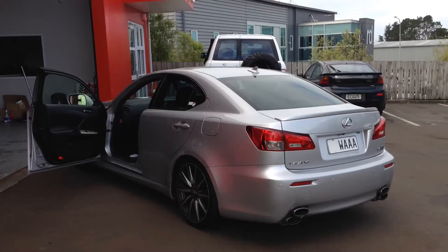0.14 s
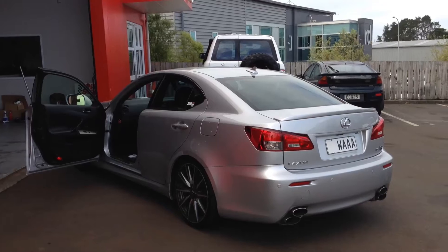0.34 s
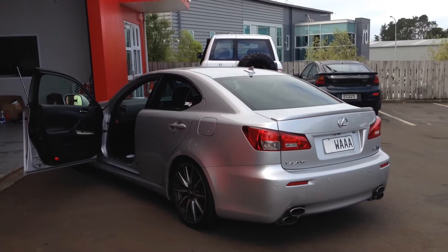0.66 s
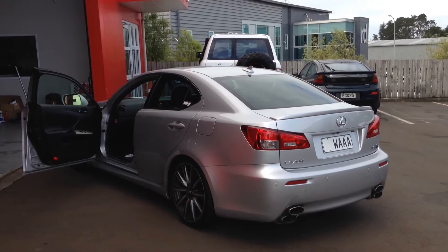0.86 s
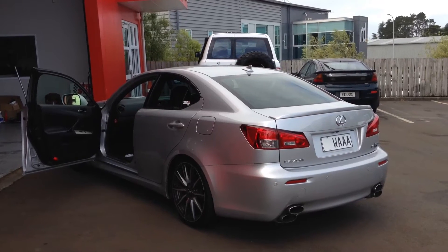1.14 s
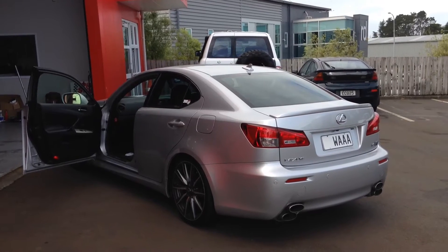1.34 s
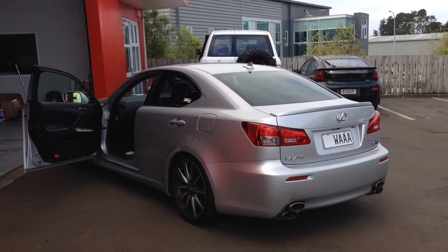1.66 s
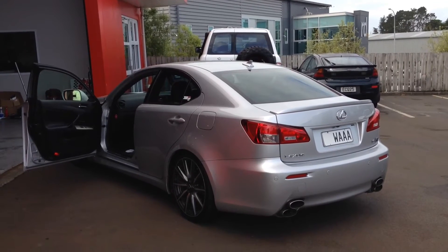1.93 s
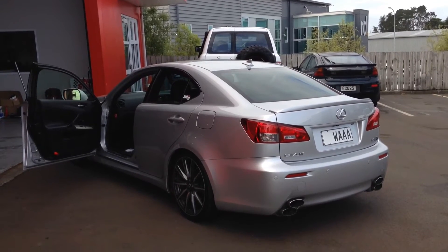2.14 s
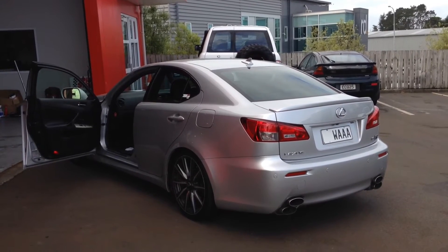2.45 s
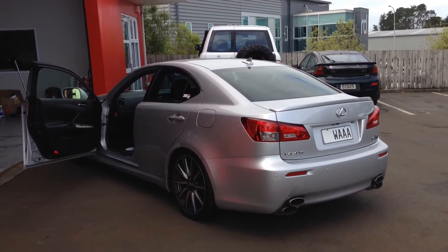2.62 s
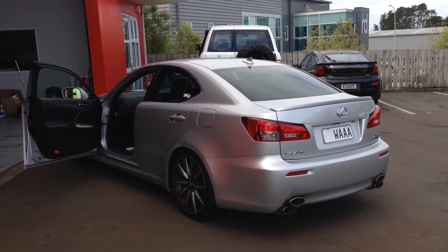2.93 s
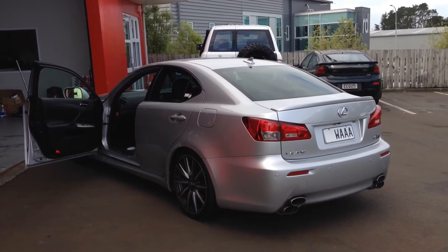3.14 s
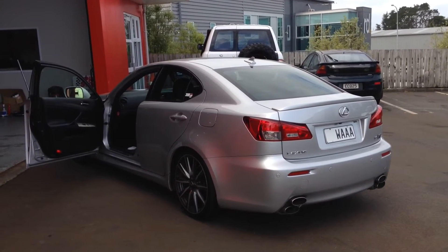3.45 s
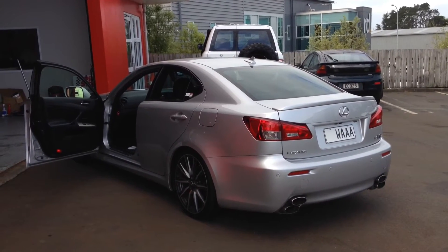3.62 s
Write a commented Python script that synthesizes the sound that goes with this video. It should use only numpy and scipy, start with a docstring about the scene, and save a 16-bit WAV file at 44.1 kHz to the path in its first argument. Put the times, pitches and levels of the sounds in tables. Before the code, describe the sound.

A parked car's open-exhaust eight-cylinder engine starts abruptly near idle at 0.1 s, growls up from 0.3 to a blip peak at 0.85, then falls in a cleaner hum. At 1.6 it snaps into a raspy climb, hitting the limiter from 2.05 to 2.5 in about eight rapid thumping bursts. It coasts down, thin metal buzzing near 2.9, and revs sharply again from 3.55, over low rumble and short yard echoes.

```python
"""A parked eight-cylinder car with an open exhaust is blipped, revved into its rev limiter, left to
coast down and blipped again. Under load the firings ring the pipes and gas rasps; coasting, the pumping
orders sing cleanly through the pipe resonances. The limiter cuts fuel and lets it back in short bursts.
Thin metal buzzes and valve gear, belts and fan hiss, over a low rumble and the bright tail of a yard."""
import sys
import numpy as np
from scipy import signal
from scipy.fft import rfft, irfft, next_fast_len
from scipy.io import wavfile
from scipy.ndimage import uniform_filter1d, minimum_filter1d

SR = 44100
rng = np.random.default_rng(int(sys.argv[2]) if len(sys.argv) > 2 else 0)


def gain_from_decibels(decibels):
    """Convert decibel values to linear amplitude factors."""
    exponent = np.asarray(decibels, float) / 20
    return 10 ** exponent


def store_pcm(level_fs):
    """Save levels as 16-bit WAV."""
    pcm = np.round(np.clip(level_fs, -1, 1) * 32767).astype(np.int16)
    wavfile.write(sys.argv[1], SR, np.atleast_2d(pcm).T)


N = 166698

# engine speed: (time [s], four-stroke cycle rate [Hz])
SPEED = [(.12, 17.2), (.25, 15.9), (.31, 16.1), (.37, 17.7), (.48, 22.6), (.65, 31.3), (.71, 35),
         (.78, 37.9), (.86, 39), (.95, 37.1), (1.11, 35.5), (1.2, 34.2), (1.35, 31), (1.47, 29.2),
         (1.56, 28), (1.62, 28.3), (1.67, 30.1), (1.8, 39), (1.9, 47), (2.0, 54), (2.06, 55.5),
         (2.45, 55.5), (2.6, 54), (2.72, 52.5), (2.88, 48), (3.12, 42.3), (3.36, 37.3), (3.52, 34.9),
         (3.6, 36.8), (3.7, 44), (3.78, 49.5)]
# exhaust under load: (time [s], firing level [dB], gas rasp level before the treble shelf [dB],
# rasp treble shelf [dB], turbulent growl level [dB])
LOAD = [(.12, -16, -43, 2, -28.5), (.18, -12.5, -44, -6, -32), (.27, -25, -55, -5, -30),
        (.31, -13.5, -63, -9, -25), (.38, -4.5, -48.5, -3.5, -24), (.42, -7, -40.5, -14, -17.5),
        (.5, -9, -40.5, 1, -12), (.63, -7.5, -29, -4, -15), (.72, -10.5, -27, -21, -13),
        (.8, -13, -30.5, -24, -18), (.87, -25.5, -57, 0, -39), (.95, -45, -53, 10, -41),
        (1.55, -40, -60, 4, -49), (1.6, -10.5, -37.5, -5, -13.5), (1.67, -6, -33, -17, -20),
        (1.71, -12, -25, -10, -13), (1.75, -10.5, -20, -6, -13), (1.9, -16, -17, 3.5, -23.5),
        (2.04, -16.5, -12, 2.5, -12.5), (2.45, -19, -14.5, 4, -18.5), (2.5, -7.5, -19, 2, -15),
        (2.55, -32, -40, -4, -17.5), (2.62, -24, -54, 0, -32), (3.52, -37, -53, 8, -45),
        (3.56, -13, -35, -18, -11), (3.6, -11.5, -19, -0.5, -11.5), (3.72, -14, -18.5, 6, -20.5),
        (3.78, -17.5, -19, -2.5, -23)]
LIMITER_START_S, LIMITER_END_S = 2.044, 2.53
PUFF_FLOOR = 0.45  # steady gas flow beneath the puffs of the firings


def unit(x):
    """Scaled to rms 1."""
    return x / np.sqrt(np.mean(x ** 2))


def curve(table, axis):
    """One column of a table, interpolated over time."""
    rows = np.array(table)
    return np.interp(np.arange(N) / SR, rows[:, 0], rows[:, axis])


def resonate(x, modes, ratio=-1):
    """Parallel resonances, each weighted by ratio against the one before; -1 alternates the sign."""
    out = 0
    for k, (hz, width_hz, db) in enumerate(modes):
        b, a = signal.iirpeak(hz, hz / width_hz, SR)
        out = out + ratio ** k * gain_from_decibels(db) * signal.lfilter(b, a, x)
    return out


def noise(points):
    """Noise of rms 1, its spectrum drawn through (Hz, dB) points on a log frequency axis."""
    rows, size = np.array(points), next_fast_len(N)
    hz = np.arange(size // 2 + 1) * SR / size + 1
    db = np.interp(np.log(hz), np.log(rows[:, 0]), rows[:, 1])
    spectrum = rfft(rng.standard_normal(size)) * gain_from_decibels(db)
    return unit(irfft(spectrum, size)[:N])


def walk(rate_hz):
    """Smooth random drift of rms near 1: random levels held 1 / rate_hz s and slewed twice."""
    k = int(SR / rate_hz)
    held = np.repeat(rng.standard_normal(N // k + 1), k)
    return 1.3 * uniform_filter1d(uniform_filter1d(held, k), k)[:N]


def rumble():
    """Low shaped noise whose level drifts slowly."""
    # rumble spectrum: (frequency [Hz], relative density [dB])
    spectrum = [(12, -57), (20, -39.5), (92, -20), (211, -4.5), (271, -7), (365, 0.5), (450, -42),
                (580, -56), (990, -120)]
    return gain_from_decibels(-23.5 + 2.35 * walk(6.003)) * noise(spectrum)


def yard_tail(car):
    """Walls return the car as a diffuse decaying tail, its bass rolled off."""
    t60_s, level_db, first_echo_s = 0.21, -12, 0.008
    t = np.arange(SR // 2) / SR
    tail = rng.standard_normal(len(t)) * gain_from_decibels(-60 * t / t60_s) * (t > first_echo_s)
    yard = signal.fftconvolve(car, tail / np.sqrt(np.sum(tail ** 2)))[:N]
    bright = signal.sosfilt(signal.butter(2, 500, "high", fs=SR, output="sos"), yard)
    return gain_from_decibels(level_db) * bright


def thuds():
    """The pipe rings briefly, with a soft start, as throttle or fuel snaps on."""
    # pipe rings: (start [s], frequency [Hz], level [dB], t60 [s])
    rings = [(0.298, 100, -5, 0.1), (.375, 300, -11, 0.37), (1.575, 112, -7.5, 0.16), (2.188, 146, -17, .1),
             (2.364, 142, -17, 0.076), (2.483, 115, -7.5, 0.084), (3.54, 511, -15, 0.21),
             (3.575, 1100, -11.5, .1), (3.584, 383, -1, .15)]
    rise_s = 0.0039
    out = np.zeros(N)
    for start_s, hz, db, t60_s in rings:
        t = np.maximum(np.arange(N) / SR - start_s, 0)
        envelope = gain_from_decibels(db - 60 * t / t60_s) * np.minimum(t / rise_s, 1)
        out += envelope * np.sin(2 * np.pi * hz * t)
    return out


def metal_buzz(cycles):
    """Four sharp, uneven taps a cycle ring thin metal."""
    # thin-metal resonances: (frequency [Hz], width [Hz], relative level [dB])
    modes = [(615, 150, -1), (770, 150, 4), (1100, 110, 6.5), (1330, 240, -4), (1550, 61, -5),
             (1790, 91, 4.5), (1940, 83, -5.5)]
    # buzz on the way down: (time [s], level [dB])
    levels = [(.8, -60), (.9, -44), (1.5, -46), (1.6, -60), (2.55, -60), (2.65, -35), (2.78, -35),
              (2.84, -26), (2.97, -24), (3.04, -34), (3.2, -36), (3.45, -42), (3.55, -60)]
    count = np.floor(4 * cycles + 0.015 * walk(150)).clip(0)
    taps = np.abs(np.diff(count, prepend=0)) * gain_from_decibels(3.1 * walk(80))
    return unit(resonate(taps, modes)) * gain_from_decibels(curve(levels, axis=1))


def fuel():
    """Gain of combustion: full, except at the limiter, where fuel is cut and returns in bursts."""
    # returning fuel: (start [s], length [s], level [dB])
    bursts = [(2.077, 0.023, -0.59), (2.132, 0.028, -2.2), (2.187, 0.028, 0.16), (2.251, 0.027, 0.32),
              (2.311, 0.023, 1), (2.362, 0.027, 1), (2.424, 0.021, 0.78), (2.49, 0.023, -1.6)]
    cut_db, rise_s, fall_s = -26, 0.0079, 0.004  # fall_s is a time constant
    t = np.arange(N) / SR
    gain = ((t < LIMITER_START_S) | (t > LIMITER_END_S)).astype(float)
    for start_s, length_s, db in bursts:
        rise = np.clip((t - start_s) / rise_s, 0, 1)
        fall = np.exp(-np.maximum(t - start_s - length_s, 0) / fall_s)
        gain += gain_from_decibels(db) * rise * fall
    return np.maximum(gain, gain_from_decibels(cut_db))


def pumping(cycles):
    """Clean orders of the cycle sing through the pipe; valve gear, belts and fan hiss."""
    # pumping and hiss: (time [s], pumping tone level [dB], mechanical hiss level [dB])
    coast = [(.12, -10, -47), (.6, -28.5, -33), (.75, -11.5, -27), (.87, -9, -33.5), (1.0, -14.5, -33),
             (1.2, -14, -35), (1.35, -13.5, -34.5), (1.5, -8.5, -37), (1.6, -16.5, -35), (1.9, -15, -17),
             (2.05, -15.5, -24), (2.5, -24.5, -28), (2.62, -16.5, -26), (2.75, -10, -28),
             (2.92, -10.5, -27), (3.1, -8.5, -30.5), (3.3, -10.5, -31.5), (3.5, -10, -32),
             (3.6, -14, -19.5), (3.78, -21.5, -31)]
    # what the pipe passes of each order: (frequency [Hz], gain [dB])
    passed = [(30, -18), (90, -24.5), (120, -21.5), (140, -11), (160, -21), (180, -18), (195, -11),
              (208, 2), (220, -8.5), (233, -13.8), (250, -18), (270, -8), (290, -17), (310, -7.5),
              (335, -8.2), (360, -7.5), (380, -3), (395, -14), (415, -24), (450, -17.5), (500, -18),
              (560, -21.5), (650, -24), (900, -18)]
    # pumping orders: (multiple of the cycle rate, relative level at mid speed [dB],
    # gain per 10 cycles a second [dB])
    order_table = [(1, -5.5, 2.5), (2, 6, 4.5), (3, 7, 0), (4, 14, -2.9), (5, 3.5, 0.6), (6, 15.5, -2.4),
                   (7, 10.5, -0.64), (8, 7, 8.5), (9, 0.7, 4.5), (10, 5.5, -1), (11, -1.4, 1),
                   (12, -4, -2.2), (13, -12.5, 5.5), (14, -1, 4), (15, -9, 2.8), (16, -4, 3.5),
                   (17, -18.5, 4), (18, -15.5, 2), (19, -18, 3.5), (20, -17, -0.5)]
    # hiss spectrum: (frequency [Hz], relative density [dB])
    hiss_spectrum = [(320, -22), (550, -1.5), (607, -5.5), (670, -7.5), (938, -5), (1080, -3.5), (2540, -8),
                     (2810, -16.5), (3320, -13), (14500, -35.5), (15800, -41)]
    mid_speed_hz, wobble_db = 38, 1.5
    cut_share = 0.17  # share of the fuel cut's dB that reaches the tones
    hz = curve(SPEED, axis=1)
    pipe_hz, pipe_db = np.transpose(passed)
    orders = np.zeros(N)
    for k, db, slope_db in order_table:
        level_db = db + slope_db * (hz - mid_speed_hz) / 10 + np.interp(k * hz, pipe_hz, pipe_db)
        level_db = level_db + wobble_db * walk(9)
        orders += gain_from_decibels(level_db) * np.sin(2 * np.pi * (k * cycles + rng.random()))
    tones = unit(orders) * gain_from_decibels(curve(coast, axis=1)) * fuel() ** cut_share
    # the hiss drifts at random and swells four times a cycle
    flutter_db = 1.2 * walk(25.12) + 0.83 * np.sin(2 * np.pi * 4 * cycles)
    hiss = noise(hiss_spectrum) * gain_from_decibels(flutter_db)
    return tones + hiss * gain_from_decibels(curve(coast, axis=2))


def burst_thump(gain):
    """Each returning burst of fuel thumps: deep band noise follows the fuel at the limiter."""
    t = np.arange(N) / SR
    band = signal.butter(2, (73, 192), "band", fs=SR, output="sos")
    deep = unit(signal.sosfilt(band, rng.standard_normal(N)))
    limiting = (t > LIMITER_START_S) * (t < LIMITER_END_S)
    return deep * gain_from_decibels(-17.5) * uniform_filter1d(gain * limiting, size=441)


def gas_rasp(phase, size, gain):
    """A decaying puff of hissing gas follows each firing and rings tail pipe and silencer shell."""
    # rasp spectrum: (frequency [Hz], relative density [dB])
    spectrum = [(290, -45), (500, 2), (553, -19.5), (771, -3.5), (904, -11.5), (1010, -1.5), (1170, -6.5),
                (1840, -2), (2310, -10.5), (2520, -8.5), (2710, -17), (3270, -9), (8990, -26), (14500, -33),
                (15800, -41)]
    # tail-pipe and silencer-shell rings: (frequency [Hz], width [Hz], relative level before ratio [dB])
    shell = [(544, 70, -5.5), (792, 35, 3), (973, 50, -1), (1122, 65, 1), (1602, 55, -6), (1880, 110, -2),
             (2540, 110, 1.5), (3196, 250, 3), (3925, 71, -7.5), (4840, 690, 8.5)]
    puff_share = 0.45  # decay constant as a share of the firing interval
    puffs = PUFF_FLOOR + np.exp(-(phase % 1) / puff_share)
    rasp = size ** 1.2 * puffs * noise(spectrum)
    rasp = unit(rasp + resonate(rasp, shell, ratio=0.86))
    treble = signal.sosfiltfilt(signal.butter(1, 4500, "high", fs=SR, output="sos"), rasp)
    rasp = rasp + treble * (gain_from_decibels(curve(LOAD, axis=3)) - 1)
    return rasp * gain * gain_from_decibels(curve(LOAD, axis=2))


def pipe_ring(x, gain, axis):
    """The exhaust pipe resonates to a drive that follows the fuel and one level column of LOAD."""
    # pipe resonances under load: (frequency [Hz], width [Hz], relative level [dB])
    modes = [(139, 37.4, -1.5), (236.5, 34.3, -1.5), (308.2, 36, -2), (389.6, 53, -5), (449, 30, -10.5),
             (494.5, 44, -14), (603, 62, -18), (842, 27, -24)]
    driven = x * gain * gain_from_decibels(curve(LOAD, axis))
    return resonate(driven, modes) / np.std(resonate(x, modes))


def firings(cycles):
    """Eight uneven, rounded pressure pulses a cycle and turbulent gas ring the pipe, with rasp and thump."""
    # mean strength of each cylinder in firing order: (level [dB])
    cylinder_db = [-4, -0.23, -4, -3.1, 0.28, -0.59, -0.82, -0.93]
    scatter_db, jitter = 1.6, 0.03  # jitter in firing intervals
    sharpness = 1.4
    phase = 8 * cycles + jitter * walk(70) + 1
    index = phase.astype(int)
    count = index.max() + 1
    size_db = np.resize(cylinder_db, count) + scatter_db * rng.standard_normal(count)
    size = gain_from_decibels(size_db)[index]
    push = size * (np.exp(-sharpness * np.cos(2 * np.pi * phase)) - np.exp(-sharpness))
    gas = rng.standard_normal(N) * (PUFF_FLOOR + unit(push))
    gain = fuel()
    ringing = pipe_ring(push, gain, axis=1) + pipe_ring(gas, gain, axis=4)
    return ringing + gas_rasp(phase, size, gain) + burst_thump(gain)


def engine_cycles():
    """Running count of engine cycles; the speed wanders and bounces with the fuel."""
    on = uniform_filter1d(fuel(), size=882)
    bounce = 0.05 * (on - uniform_filter1d(on, size=2600))
    return np.cumsum(curve(SPEED, axis=1) * (1 + 0.003 * walk(12) + bounce)) / SR


def scene():
    """Engine, the bright tail of the walled yard and a low rumble."""
    cycles = engine_cycles()
    car = thuds() + metal_buzz(cycles) + pumping(cycles) + firings(cycles)
    return (rumble() + yard_tail(car) + car)[None]


def band_limit(x):
    """A steep low-pass at the top of the band."""
    return signal.sosfilt(signal.butter(12, 15950, fs=SR, output="sos"), x)


def record(dry):
    """Sound starts after a blank; a look-ahead limiter holds the peaks, then a steep low-pass follows."""
    start_s, ceiling_db, top_hz = 0.1195, -0.4, 15300
    x = dry * (np.arange(N) >= start_s * SR)
    need = np.minimum(1, gain_from_decibels(ceiling_db) / (np.abs(x) + 1e-9))
    gain = uniform_filter1d(minimum_filter1d(need, size=883), size=661)
    low_pass = signal.ellip(8, 0.2, 60, top_hz, fs=SR, output="sos")
    mix = signal.sosfilt(low_pass, x * gain)
    return band_limit(mix)


dry = scene()
out = record(dry)
store_pcm(out)
```